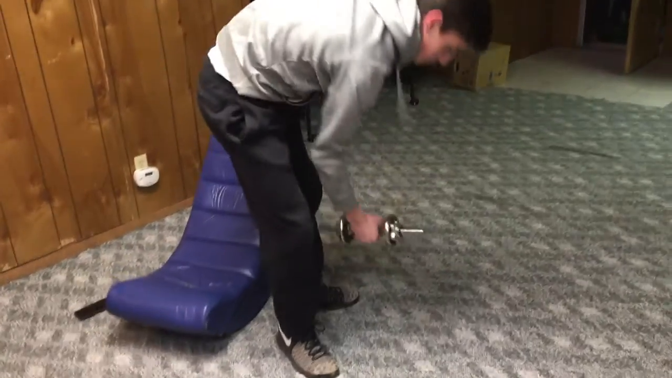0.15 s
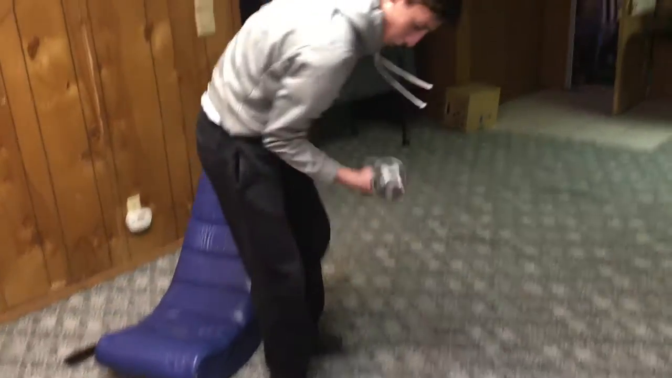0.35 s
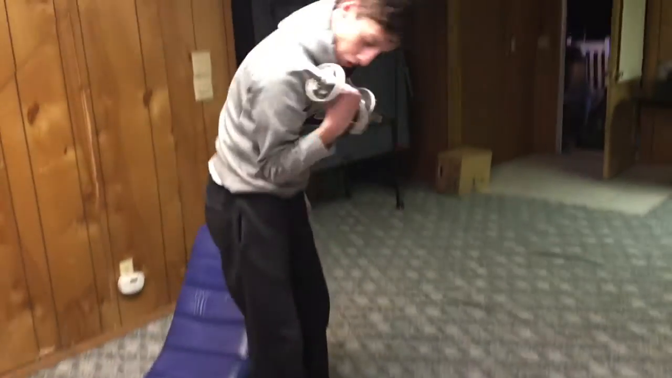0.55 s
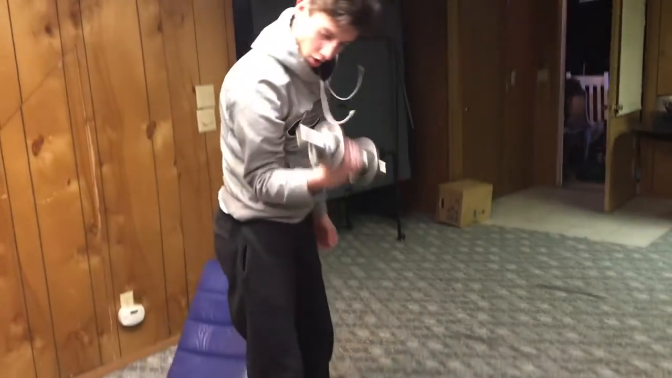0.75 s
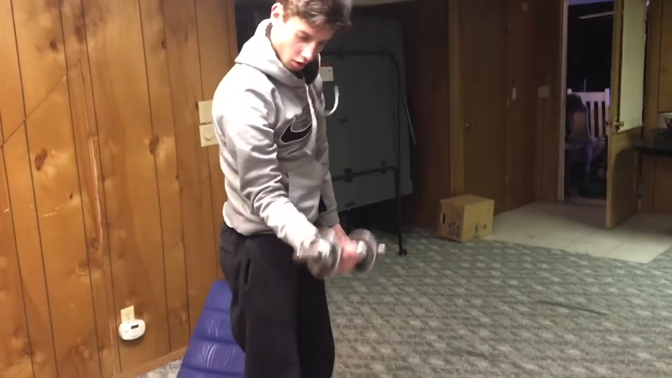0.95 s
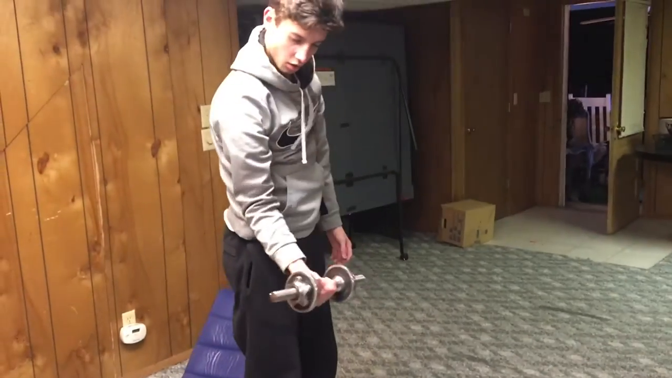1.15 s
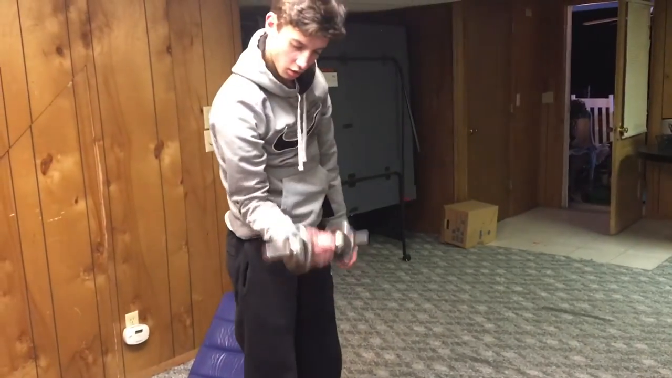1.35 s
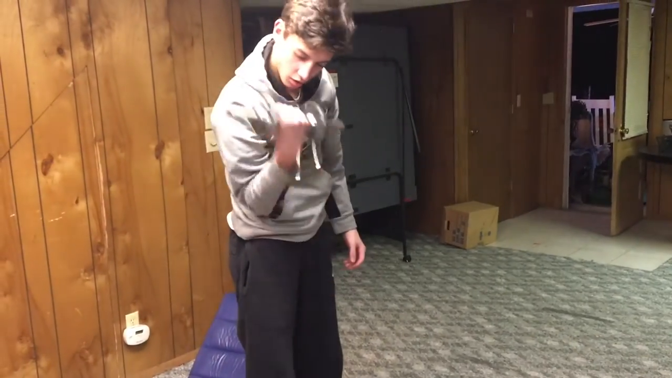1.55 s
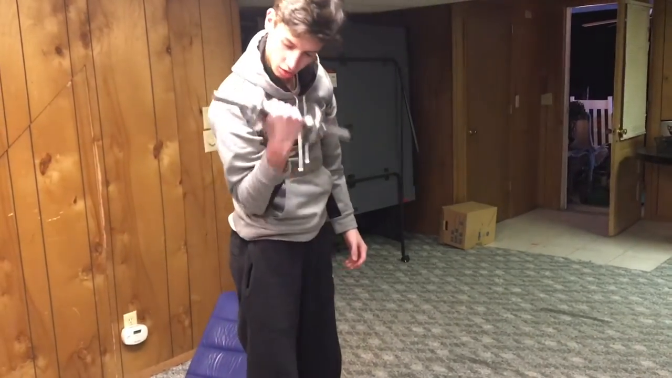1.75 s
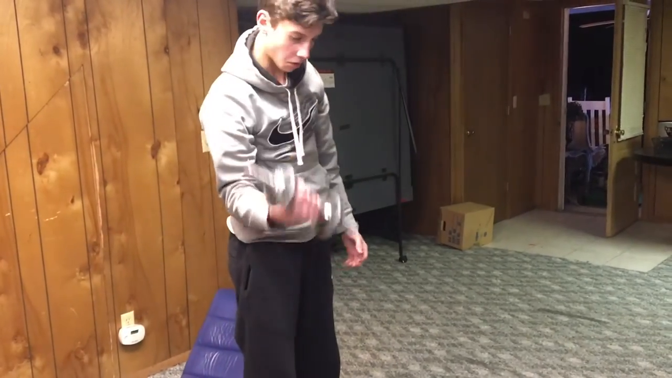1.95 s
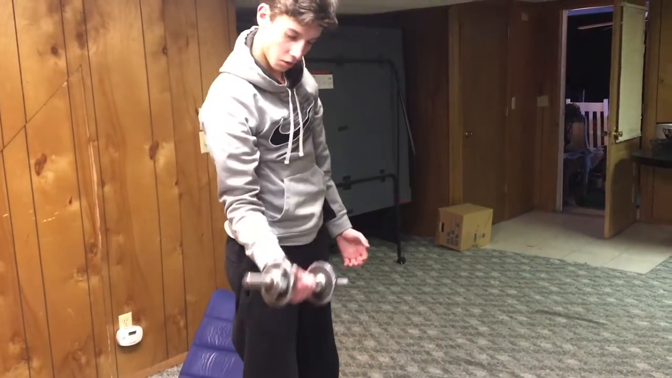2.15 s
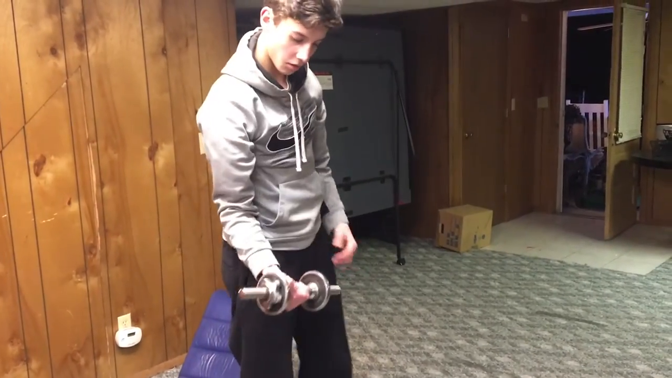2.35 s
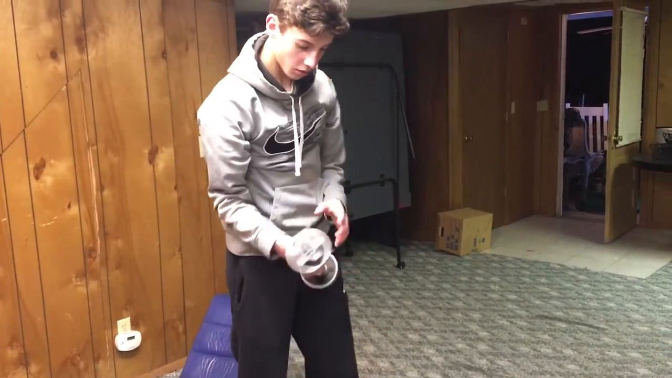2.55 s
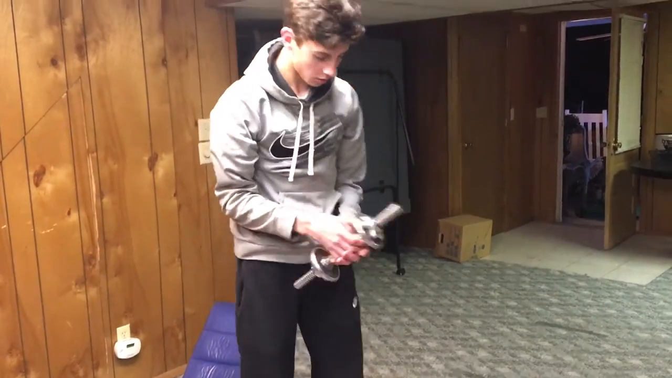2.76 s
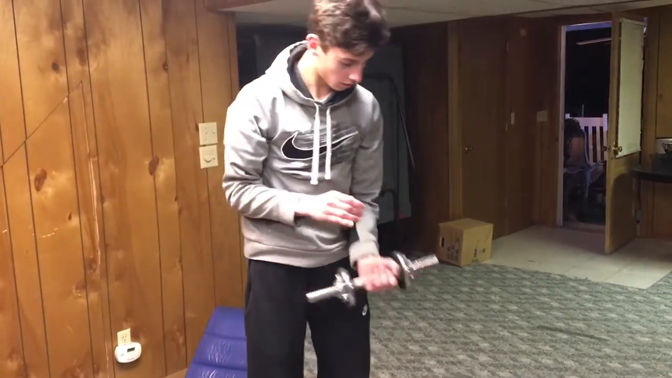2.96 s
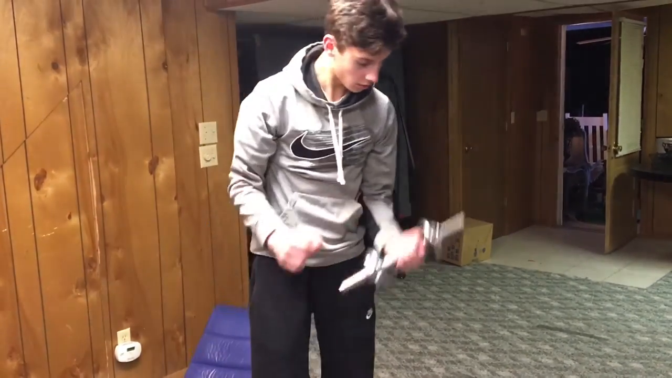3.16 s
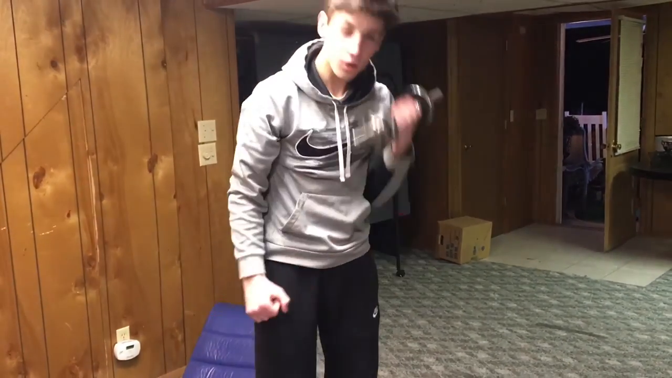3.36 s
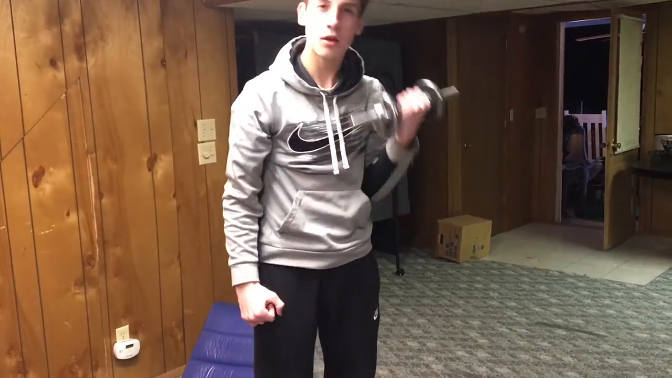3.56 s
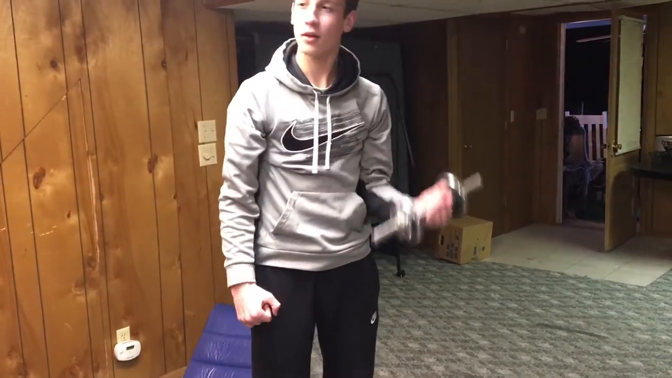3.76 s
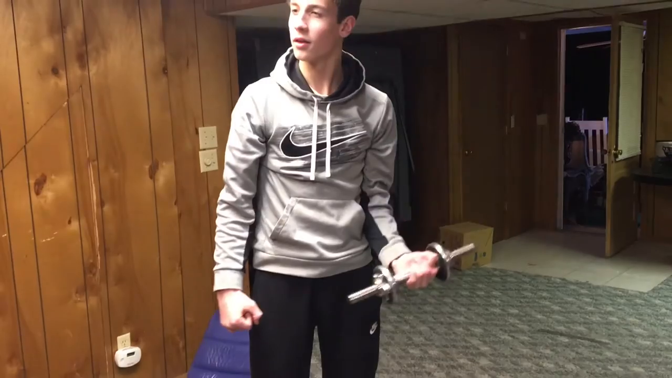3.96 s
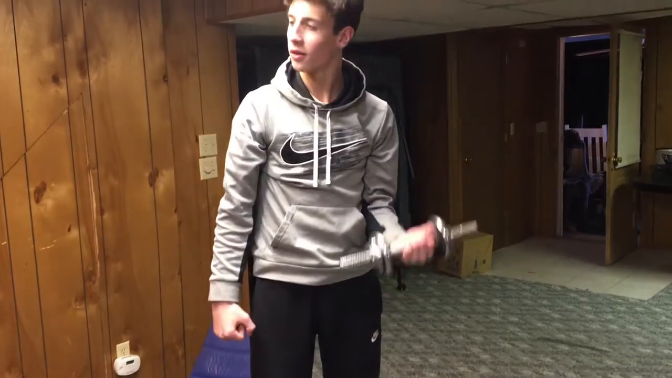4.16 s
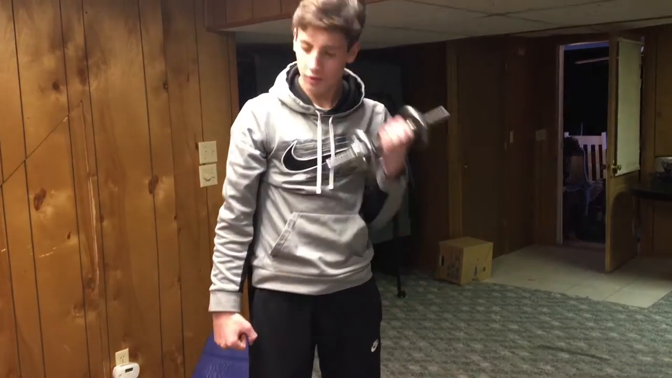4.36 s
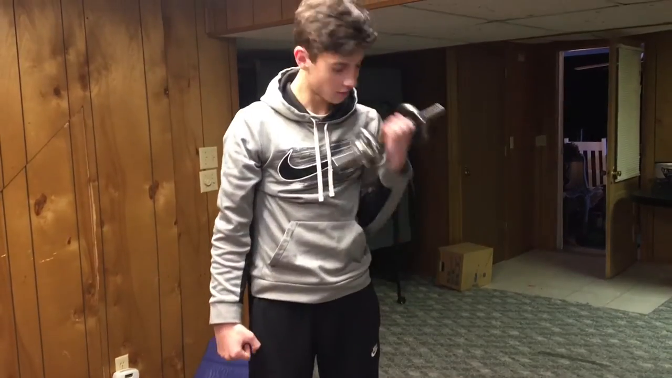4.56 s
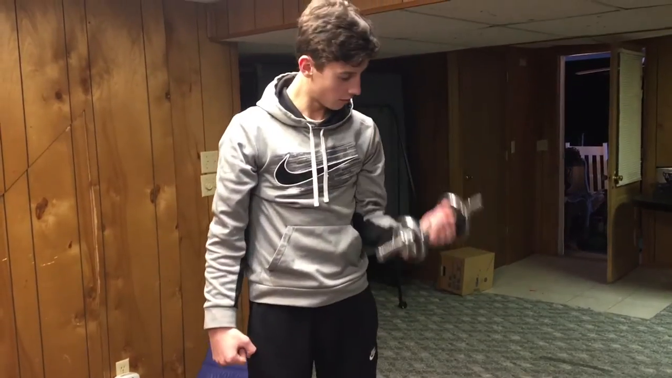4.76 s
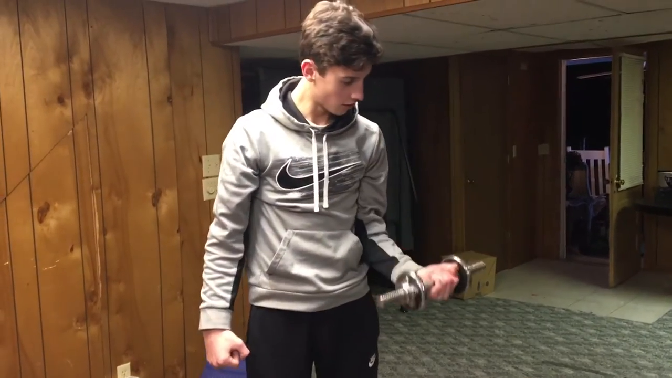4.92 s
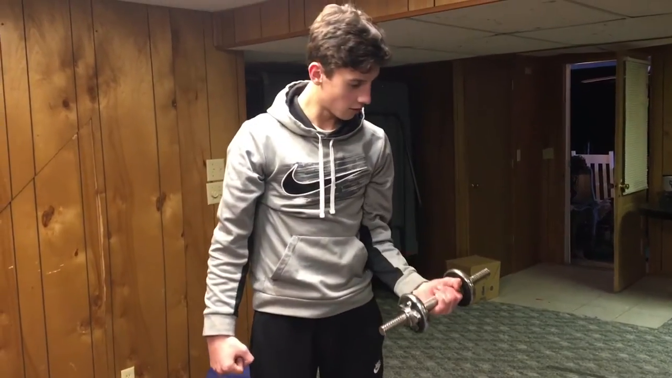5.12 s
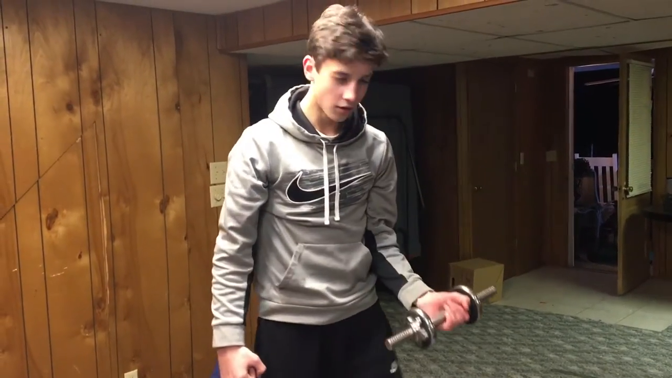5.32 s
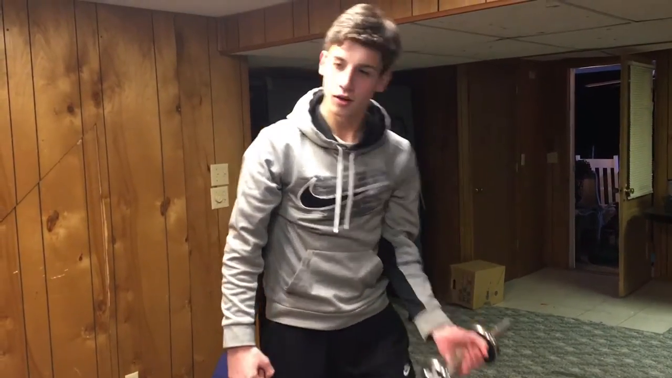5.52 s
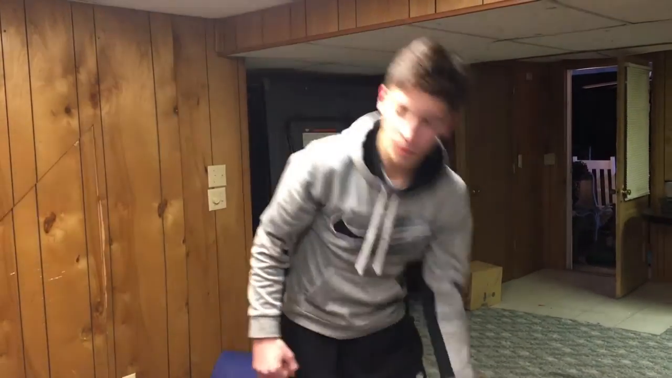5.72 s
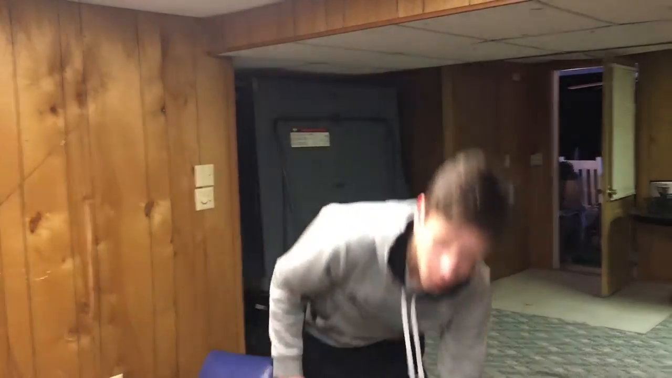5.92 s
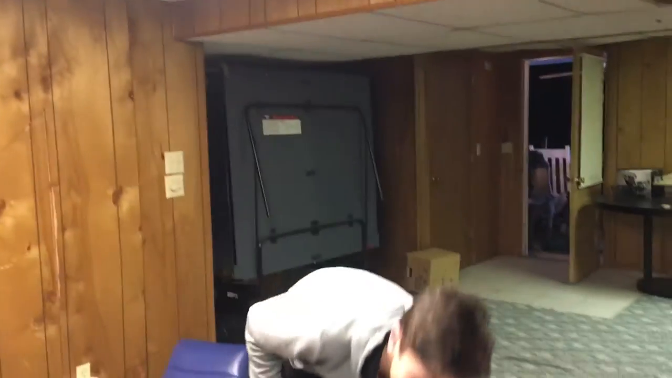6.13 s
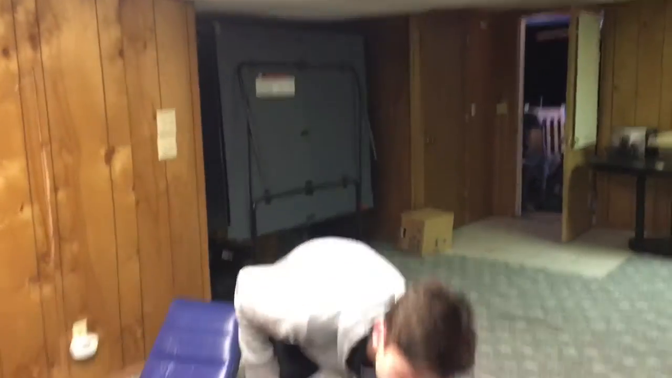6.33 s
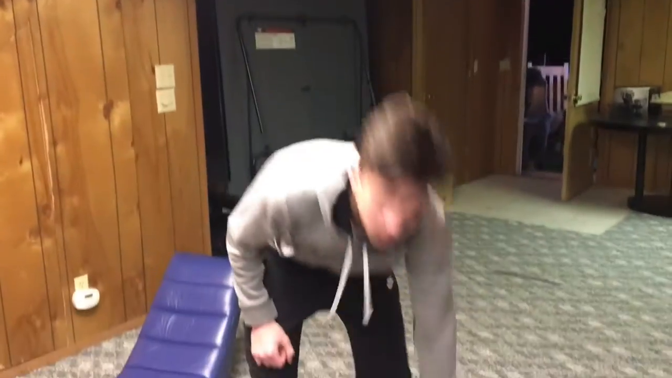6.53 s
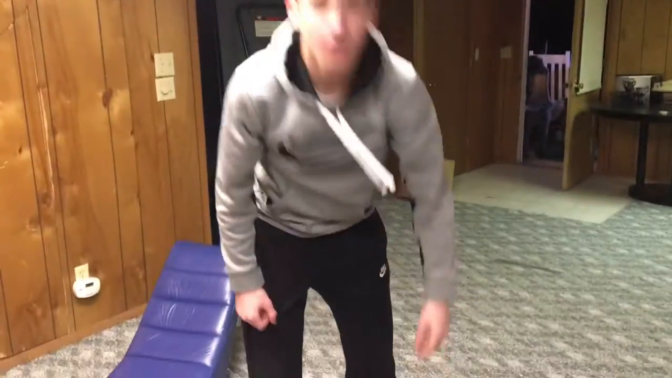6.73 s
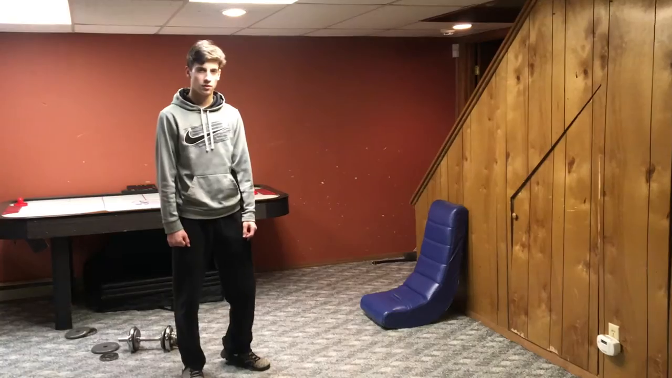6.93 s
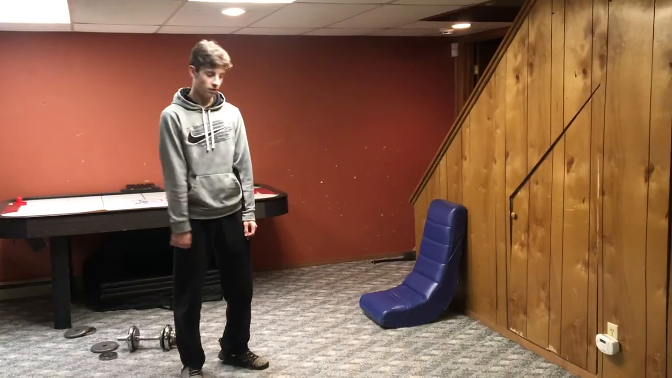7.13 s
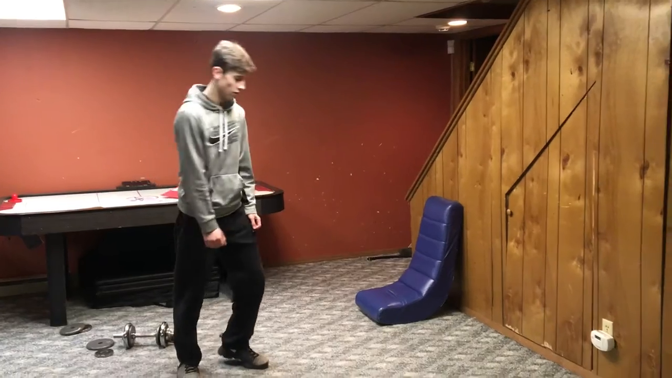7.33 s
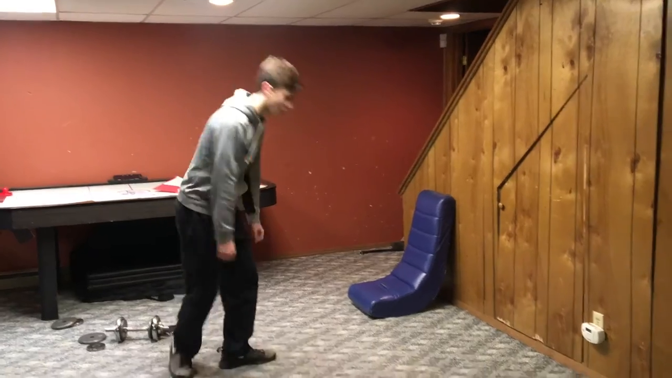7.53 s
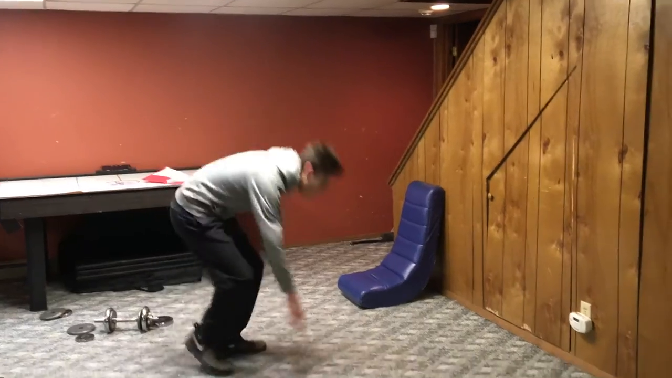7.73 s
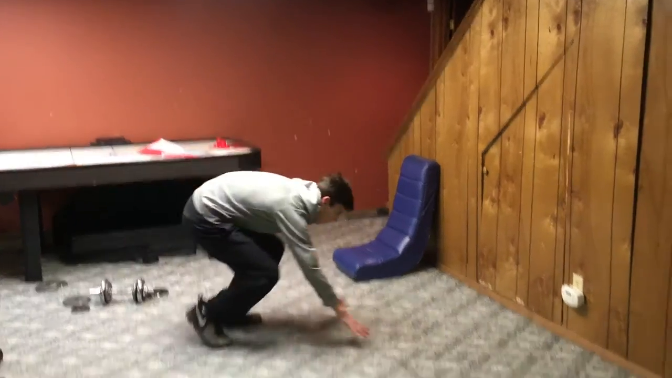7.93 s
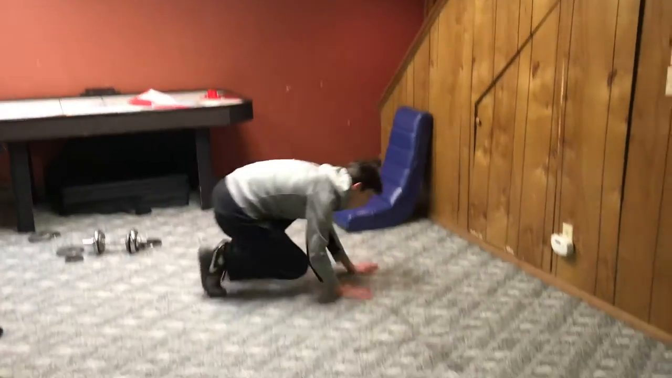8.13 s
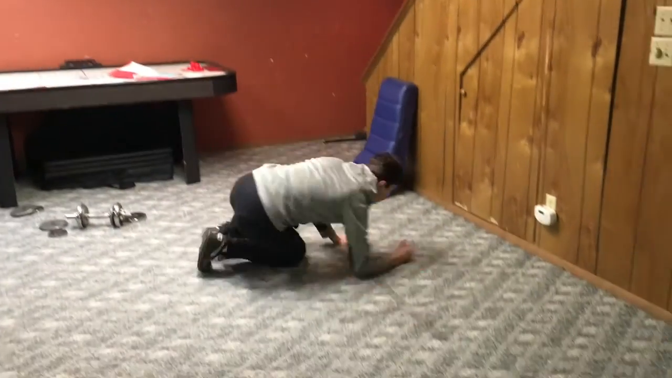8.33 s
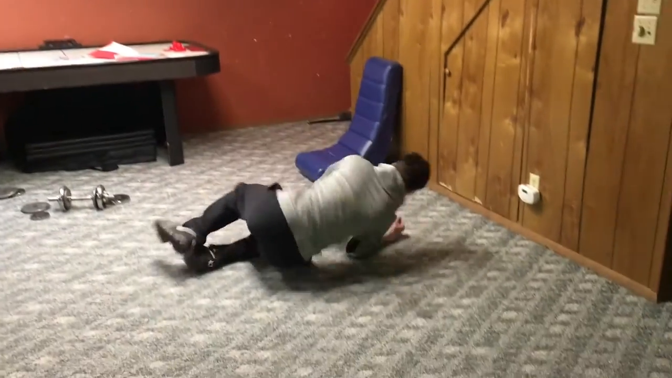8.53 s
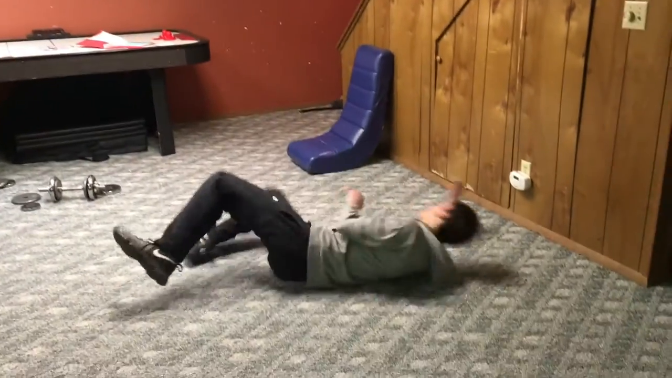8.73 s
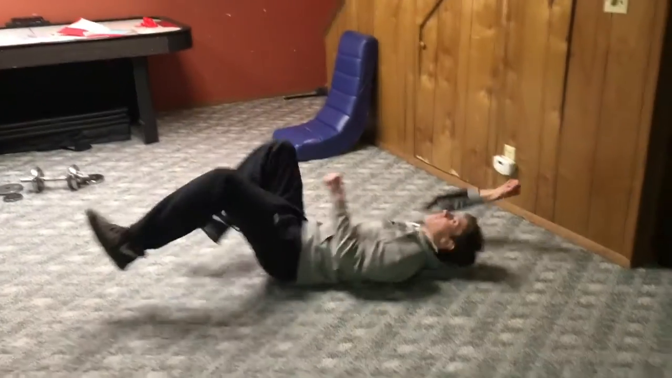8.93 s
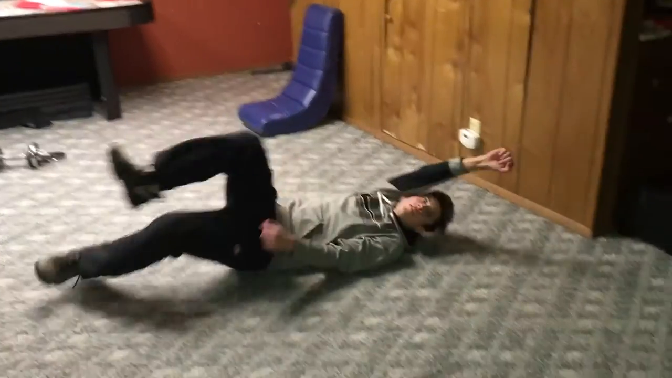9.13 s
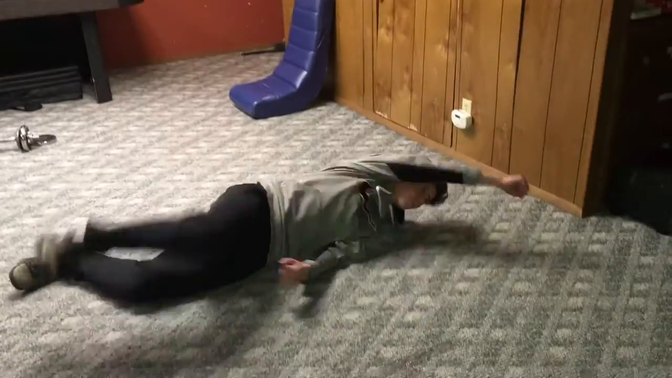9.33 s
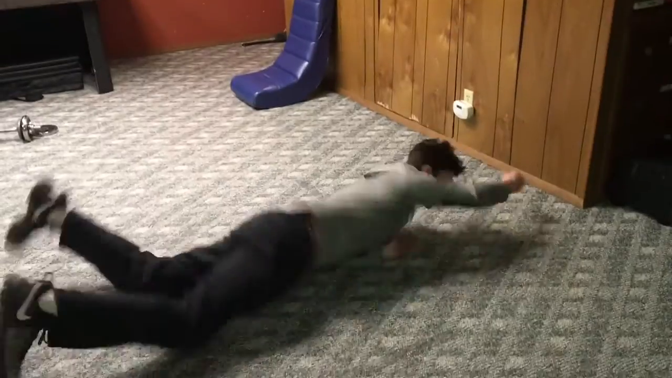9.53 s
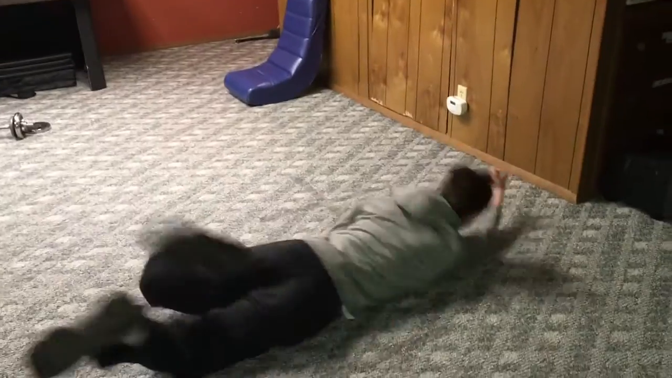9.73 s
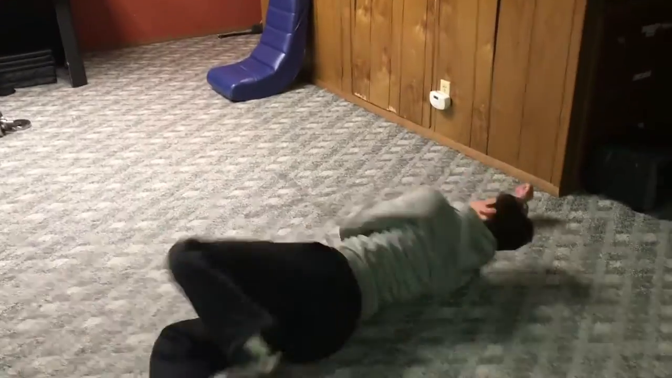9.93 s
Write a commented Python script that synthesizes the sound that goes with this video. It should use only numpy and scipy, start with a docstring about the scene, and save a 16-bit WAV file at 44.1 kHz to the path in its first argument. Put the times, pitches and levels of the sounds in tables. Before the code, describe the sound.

Loose iron plates clack and ring on a small dumbbell, which crashes down among spare plates, then a body thuds and rolls on carpet.

```python
"""A small dumbbell with loose iron plates is curled in a carpeted, wood-panelled basement with a low room rumble.
Plates slide and clack on the bar: filtered clicks with chatter, and decaying sines for plates, collars and bar.
It is then set down among spare plates with a clash of many modes, crowded treble noise and a boom of the woodwork.
Soft steps, a body dropping and rolling on the carpet (low thuds, grainy filtered noise) and a last knock on
the panelling follow."""
import sys
import numpy as np
from scipy import signal
from scipy.fft import rfft, irfft, next_fast_len
from scipy.io import wavfile
from scipy.ndimage import uniform_filter1d

SR = 44100
rng = np.random.default_rng(int(sys.argv[2]) if len(sys.argv) > 2 else 0)


def dump_mix(stems):
    """Bounce the given channels to the path in sys.argv[1] as a 16-bit WAV at rate SR."""
    frames = np.atleast_2d(stems).T  # one column per channel
    limited = np.clip(frames, -1, 1)  # hard clip at full scale
    pcm = np.round(limited * 32767).astype(np.int16)
    wavfile.write(sys.argv[1], SR, pcm)


N = 440118
T = np.arange(int(.7 * SR)) / SR  # time within one blow, s
ATTACK = int(.012 * SR)  # samples over which the level of a blow is set

# Dumbbell modes, one list each for plate low ring, plate high ring, collar and bar, before the scatter of
# each strike: pitch_hz, relative level_db, t60 relative to the ring time
IRON_MODES = [
    [(829, -20.5, 0.99), (1950, -42, 0.96), (1924, 2, 1), (2020, -16, 0.31), (2060, -4.5, 0.54)],
    [(3580, -28, 0.73), (3616, 6.5, 1.06), (3540, 5.5, 0.72), (4350, -13, 0.59), (4850, -17, 1.2),
     (8380, -14, 0.69), (11450, -15, 0.4)],
    [(3168, -1, 0.62), (3222, 1.5, 0.6), (4800, 11.5, 0.1), (4790, -9.5, 0.52), (6970, -19.5, 2.7)],
    [(5900, 23, 0.47), (6080, -13, 0.93)],
]


def undb(db):
    """Decibels to gain."""
    return 10 ** (np.asarray(db) / 20)


def fade(t60):
    """Exponential decay by 60 dB in t60 seconds, over the length of one blow."""
    return np.exp(-np.log(1000) * T / max(t60, 1e-3))


def blow(x, db):
    """Scale a blow so that its attack has the given rms level."""
    return x * undb(db) / np.sqrt(np.mean(x[:ATTACK] ** 2))


def add(track, s, x):
    """Mix x into the track at s seconds."""
    i = max(int(s * SR), 0)
    track[i:i + len(x)] += x[:max(N - i, 0)]


def colour(x, points, tilt_db=0):
    """Causal minimum-phase filter through (Hz, dB) points, tilted in dB per octave from 1 to 6.5 kHz."""
    size = next_fast_len(len(x)) * 2
    bin_hz = np.arange(size // 2 + 1) * SR / size
    octave = np.log2(np.maximum(bin_hz, 10))
    hz, db = np.transpose(points)
    tilted_db = db + tilt_db * np.log2(np.clip(hz, 1000, 6500) / 1000)
    gain_db = np.interp(octave, np.log2(hz), tilted_db)
    # folding the cepstrum forward in time gives the phase that keeps the filter causal
    cepstrum = irfft(gain_db * np.log(10) / 20)
    cepstrum[1:size // 2] *= 2
    cepstrum[size // 2 + 1:] = 0
    response = np.exp(rfft(cepstrum))
    return irfft(rfft(x, size) * response)[:len(x)]


def noise(points, grain_db=0):
    """Coloured noise of rms 1; grain makes it a crowd of unequal little snags."""
    snags = np.repeat(rng.standard_normal(N // 64 + 1), 64)[:N]
    x = colour(rng.standard_normal(N) * undb(grain_db * snags), points)
    return x / x.std()


def ring(modes, life=1, detune=.003, spot_db=2):
    """Decaying sines (Hz, dB, t60 times life); the spot that is struck shifts their pitch and balance."""
    chance = rng.standard_normal((len(modes), 2))
    out = np.zeros(len(T))
    for (hz, db, t60), (pitch_chance, level_chance) in zip(modes, chance):
        tone = np.sin(2 * np.pi * hz * (1 + detune * pitch_chance) * T)
        out += undb(db + spot_db * level_chance) * fade(t60 * life) * tone
    return out


def background(rumble_db=-60, tone_db=-66, tone_hz=60):
    """Low building rumble with a faint steady low tone and a faint hiss: filtered noise and a sine."""
    # colour of rumble and hiss: pitch_hz, relative density_db (dB per Hz)
    rumble_colour = [(15, -41), (28, -27.5), (42, -10), (62, -3), (85, -5.5), (110, -12.5), (145, -23),
                     (220, -28.5), (340, -30.5), (450, -36.5), (1000, -40), (3000, -45.5), (10000, -52.5),
                     (16000, -53)]
    low_tone = np.sqrt(2) * np.sin(2 * np.pi * tone_hz * np.arange(N) / SR)  # rms 1
    return undb(rumble_db) * noise(rumble_colour) + undb(tone_db) * low_tone


def room(x, first_s=0.012, sparse_db=4, low_t60_s=0.3, high_t60_s=0.14, room_db=-14.5):
    """Panelled walls return a short tail of uneven reflections whose treble dies first."""
    unevenness = undb(sparse_db * rng.standard_normal(len(T)))
    echoes = rng.standard_normal(len(T)) * unevenness * (T > first_s)
    low = signal.sosfilt(signal.butter(1, 2500, fs=SR, output="sos"), echoes)
    tail = low * fade(low_t60_s) + (echoes - low) * fade(high_t60_s)
    tail /= np.sqrt(np.sum(tail ** 2))
    return x + undb(room_db) * signal.fftconvolve(x, tail)[:N]


def snatching(depth_db=2, per_s=55):
    """Cloth catches and lets go: a gain that steps to random levels with short ramps between."""
    hold = int(SR / per_s)
    steps = np.repeat(rng.standard_normal(N // hold + 1), hold)[:N]
    return undb(depth_db * uniform_filter1d(steps, hold // 2))


def rubbing(swish_db=-0.5, scuff_db=0, brush_swish_db=-3.5, brush_scuff_db=-1.0, floor_db=-66, floor_follows=.4):
    """Grainy friction of sleeves and carpet; the harder the body drags on the pile, the more the floor shakes."""
    # colours of cloth on cloth, cloth on carpet and the loaded floor: pitch_hz, relative level_db
    swish_colour = [(800, -22), (2500, 2.5), (4000, 1), (6500, -2.5), (10000, -9), (13000, -11.5),
                    (16000, -14)]
    scuff_colour = [(200, -10), (500, 0), (900, 0.5), (1800, -1), (2800, -7.5), (4500, -17), (10000, -32.5)]
    floor_colour = [(50, -8), (110, 4), (230, -3), (350, -3), (480, -22), (900, -33), (3000, -61.5)]
    # body walking, dropping and rolling, before the swish and scuff offsets: time_s, treble_db, midrange_db
    friction_levels = [(7.2, -103, -84), (7.39, -75.5, -68.5), (7.45, -88, -77.5), (7.88, -75.5, -72.5),
                       (8.02, -90, -78), (8.06, -71, -63.5), (8.22, -77, -73), (8.25, -64, -65),
                       (8.32, -68, -70), (8.38, -65.5, -54.5), (8.5, -84, -78.5), (8.65, -74, -65.5),
                       (8.85, -72, -64), (8.96, -94, -88), (9.14, -104, -80.5), (9.29, -72, -57.5),
                       (9.31, -85, -67), (9.51, -70, -60.5), (9.9, -91.5, -80.5), (9.98, -82, -72.5)]
    # single brushes of sleeve or shoe, before the brush offsets: centre_s, spread_s, level_db
    brush_events = [(0.417, 0.058, -70.5), (2.459, 0.0095, -70.5), (2.674, 0.018, -65),
                    (2.902, 0.078, -70.5), (3.248, 0.04, -71.5), (3.34, 0.01, -64), (5.461, 0.014, -68.5),
                    (5.647, 0.018, -61.5), (5.844, 0.032, -72), (6.094, 0.017, -68), (6.171, 0.018, -72),
                    (6.924, 0.019, -72), (7.861, 0.0044, -61.5), (9.689, 0.011, -72.5),
                    (9.806, 0.017, -70.5)]
    t = np.arange(N) / SR
    times, treble_db, midrange_db = np.transpose(friction_levels)
    swish = undb(np.interp(t, times, treble_db, left=-160))
    drag = undb(np.interp(t, times, midrange_db, left=-160))
    brushes = np.zeros(N)
    for s, spread, db in brush_events:
        brushes += undb(db) * np.exp(-.5 * ((t - s) / spread) ** 2)
    cloth = noise(swish_colour, grain_db=2.5) * (swish * undb(swish_db) + brushes * undb(brush_swish_db))
    carpet = noise(scuff_colour, grain_db=2.0) * (drag * undb(scuff_db) + brushes * undb(brush_scuff_db))
    shaking = undb(floor_db) * (drag / undb(midrange_db.mean())) ** floor_follows
    return (cloth + carpet) * snatching() + noise(floor_colour) * shaking


def slap(db, t60):
    """A short burst of cloth or skin meeting a surface: filtered, fading noise."""
    # colour of a slap on carpet or cloth: pitch_hz, relative level_db
    slap_colour = [(150, -23), (400, 4), (800, 5), (1600, -7), (3000, -10), (6000, -20), (10000, -23.5),
                   (16000, -29)]
    return blow(colour(rng.standard_normal(len(T)) * fade(t60), slap_colour), db)


def thuds(push_t60=0.024, shake=1.0, shake_t60=.28, middle_slap_db=-10.5, middle_hz=240, slap_db_per_octave=11.5):
    """A soft push of a cycle or two, the floor shaking after it, and a slap, stronger for a quicker push."""
    # feet, hands, body and dumbbell on the floor: start_s, level_db without the slap, push pitch_hz
    thud_events = [(0.481, -60.5, 310), (2.65, -57.5, 342), (5.659, -60, 320), (6.067, -58, 216),
                   (6.2751, -49, 340), (6.915, -52, 111.4), (7.256, -52.5, 150.3), (7.327, -56, 298),
                   (7.488, -49.5, 72), (7.848, -57, 277), (7.922, -54, 280), (8.058, -53.5, 202),
                   (8.135, -54, 160), (8.375, -49, 227), (8.682, -51, 210), (8.715, -48.5, 151.4),
                   (9.15, -54, 182), (9.222, -48.5, 239), (9.242, -47, 111), (9.648, -55, 260)]
    out = np.zeros(N)
    for s, db, hz in thud_events:
        slap_db = db + middle_slap_db + slap_db_per_octave * np.log2(hz / middle_hz)
        rise = 1 - np.exp(-T * hz)
        push_fade = fade(push_t60 * 200 / hz)  # push_t60 holds at 200 Hz
        push = blow(np.sin(2 * np.pi * hz * T) * push_fade * rise, 0)
        octaves = hz * 2. ** np.arange(-2, 4)
        floor_points = list(zip(octaves, (-9, -2.5, 2.5, -10.5, -25.5, -52)))
        floor = colour(rng.standard_normal(len(T)), floor_points)
        body = push + shake * floor / floor.std() * fade(shake_t60) * rise
        add(out, s, blow(body, db) + slap(slap_db, t60=0.062))
    return out


def knocks(rise_s=0.002):
    """Heavy blows make the hollow woodwork boom in its modes; the panel takes a moment to move."""
    # blows on the woodwork: start_s, boom level_db, slap_db
    knock_events = [(6.2892, -45.5, -62.5), (9.5715, -36.5, -52.5)]
    # woodwork modes before the scatter of each strike: pitch_hz, relative level_db, t60_s
    wood_modes = [(131.4, -16, 0.66), (176, -2, .12), (233.9, 5, 0.071), (280, -7, .25), (354, -2, 0.19),
                  (409, -2, 0.14), (421, -14.5, .09), (621, -18, 0.15)]
    out = np.zeros(N)
    for s, db, slap_db in knock_events:
        boom = ring(wood_modes, detune=0.011) * (1 - np.exp(-T / rise_s))
        add(out, s, blow(boom, db) + slap(slap_db, t60=.09))
    return out


def clack(db, hardness, bounce=0.032, bounce_t60=.009, chatter=0.091, chatter_t60=.09, uneven_db=6):
    """Iron meets iron: a sharp contact, a few quick rebounds and an uneven dying chatter."""
    # colour of a plate clacking on the bar, before the hardness tilt: pitch_hz, relative level_db
    clack_colour = [(100, -26.5), (430, -15.5), (700, -5.5), (1150, -2), (1550, 1), (2100, 2.5), (2650, -9),
                    (3400, -2.5), (4200, -10.5), (4900, -15.5), (6500, -18), (8000, -32.5), (10500, -34.5),
                    (16000, -49.5)]
    taps = rng.standard_normal(len(T)) * undb(uneven_db * rng.standard_normal(len(T)))
    rebounds = bounce * fade(bounce_t60) + chatter * fade(chatter_t60)
    impulses = (T == 0) + rebounds * taps / taps.std()
    return blow(colour(impulses, clack_colour, hardness), db)


def iron(modes, db, t60, hardness=0, tilt_db=0.78, rough=0.25, buzz_hz=260, rise_s=0.0025):
    """A ringing piece buzzes against its neighbours; soft contacts leave its high modes quiet."""
    buzz = signal.sosfilt(signal.butter(2, buzz_hz, fs=SR, output="sos"), rng.standard_normal(len(T)))
    softness_tilt = tilt_db * min(hardness - 1, 0)  # dB per octave above the first mode listed
    first_hz = modes[0][0]
    struck = [(hz, g + softness_tilt * np.log2(hz / first_hz), life) for hz, g, life in modes]
    buzzing = ring(struck, t60, detune=0.0057) * (1 + rough * buzz / buzz.std())
    return blow(buzzing * (1 - np.exp(-T / rise_s)), db)


def set_down(free_db=-21, free_t60=.2, top_free_db=-11, top_free_t60=0.16,
             shimmer_db=-21, shimmer_t60=.06, heap_chatter=0.074):
    """The dumbbell crashes into the spare plates and bounces; those not under it ring on faintly."""
    # landing and bounces: start_s, clack_db, hardness (dB per octave), heap ring_db, top plate ring_db, t60_s
    clash_events = [(6.2865, -34.5, 5.5, -27.5, -48, 0.024), (6.2889, -40, 9, -34.5, -39, 0.028),
                    (6.3856, -55, -4, -50, -50, 0.019), (6.4028, -43.5, 8, -56, -46, 0.074),
                    (6.4191, -36, 9, -60, -40, .08), (6.4555, -39.5, 7.5, -35, -38.5, 0.022)]
    # heap of spare plates and its top plate, before scatter: pitch_hz, relative level_db, relative t60
    heap_modes = [(948, -18, 2.3), (1612, -16.5, .8), (1798, -11, .9), (2378, -10.5, .9), (2840, -11, .8),
                  (3680, -5.5, .8), (3730, 6.5, 1.1), (4100, -5.5, 0.64), (4630, -7.5, 1.5),
                  (4780, -3, 0.82), (4900, -2, 1.078), (5270, -7, 1.1), (5910, -2.5, 1.8), (6223, -9, 0.56),
                  (8340, -11.5, 1.4), (8180, -16, 1.3), (9539, -26, 0.43), (11490, -11.5, 1.),
                  (12450, -24, .9), (14630, -32, .9)]
    top_plate_modes = [(3206, -2, 2.5), (3090, -2.5, 1.)]
    # colour of the crowd of faint high modes in the spare plates: pitch_hz, relative level_db
    shimmer_colour = [(3000, -24.5), (5000, -3.5), (7000, -5.5), (8400, -1), (10000, -9), (11500, -0.5),
                      (13000, -4), (16000, -11.5)]
    out = np.zeros(N)
    for s, db, hardness, heap_db, top_db, t60 in clash_events:
        heap = iron(heap_modes, heap_db, t60, rough=.55, buzz_hz=320)
        heap += blow(ring(heap_modes, free_t60), heap_db + free_db)
        top = iron(top_plate_modes, top_db, t60)
        top += blow(ring(top_plate_modes, top_free_t60), top_db + top_free_db)
        crowd = colour(rng.standard_normal(len(T)) * fade(shimmer_t60), shimmer_colour)
        shimmer = blow(crowd, db + shimmer_db)
        add(out, s, clack(db, hardness, chatter=heap_chatter) + heap + top + shimmer)
    return out


def contact(kind, db, t60, middling_db=-47.5, hardness_per_db=0.49, middling_chatter=0.08, chatter_per_db=-.5):
    """A clack and the ring of each part in its share; a strong blow is brighter and seats, a weak one chatters."""
    # ways the iron parts meet, against the blow: clack_db, plate low ring_db, plate high ring_db,
    # collar_db, bar_db; then hardness of a middling blow (dB per octave)
    contact_shares = {"rim": (-10.5, -0.5, -16, -33, -30, 0.5), "face": (-3, 0, -2.5, -8, -18.5, 4.5),
                      "chime": (-20, -1.5, -0.5, -15, -20.5, 0.5), "edge": (-10, -8, 1.5, -22, -19.5, -1),
                      "collar": (-0.5, -19, -13, 0, -18, -3), "wedged": (-3.5, -6.5, -14, -3, -19, -5.5),
                      "stop": (-1.5, -24, -32, -5, -14.5, -4), "bar": (-2.5, -16.5, -21, -16.5, -11, 0)}
    clack_db, *part_dbs, hardness = contact_shares[kind]
    force_db = db - middling_db
    hardness = hardness + hardness_per_db * force_db
    rings = sum(iron(modes, db + part_db, t60, hardness) for modes, part_db in zip(IRON_MODES, part_dbs))
    chatter = middling_chatter * undb(chatter_per_db * force_db)
    return clack(db + clack_db, hardness, chatter=chatter) + rings


def dry_clack(db, hardness, pinched_db=-6, tock_per_hardness=0.42, dry_chatter=0.15,
              settle_db=-2, loose_hardness=-5):
    """A pinched plate gives a short tock; a harder tick stirs the plate less and chatters less."""
    # short modes of a pinched plate before the scatter of each strike: pitch_hz, relative level_db, t60_s
    pinched_modes = [(1120, 0.5, 0.071), (1287, 9.5, 0.033), (1590, 1.5, 0.14)]
    tock = blow(ring(pinched_modes, detune=0.031), db + pinched_db - tock_per_hardness * hardness)
    chatter = dry_chatter * undb(settle_db * max(hardness - loose_hardness, 0))
    return clack(db, hardness, chatter=chatter) + tock


def sliding(taps_per_s=95, fall_db=-6.5, scatter_db=0.5, hardness=-5.5,
            tock_db=-3, ring_t60=.05, spacing_scatter=0.25):
    """A sliding plate taps the bar at uneven intervals, on the whole ever more weakly, and rings a little."""
    # slides along the bar: start_s, length_s, level_db before fall and tap offset, rim ring_db against it
    slide_events = [(0.713, .135, -63, 6), (1.612, 0.12, -72, 4), (1.95, .12, -58, -34),
                    (2.85, 0.083, -66.5, -6), (3.206, .1, -68, -12), (3.402, .16, -62.5, 3),
                    (4.282, .05, -67.5, -5), (4.658, 0.092, -65, 2.5)]
    out = np.zeros(N)
    for start, length, db, ring_db in slide_events:
        count = max(int(length * taps_per_s), 1)
        for k, (late, size) in enumerate(rng.standard_normal((count, 2))):
            along = (k + .5 + spacing_scatter * late) / count  # 0 to 1 through the slide
            tap_db = db + fall_db * along + scatter_db * size
            rim = blow(ring(IRON_MODES[0], ring_t60, detune=0.084), tap_db + ring_db)
            add(out, start + along * length, dry_clack(tap_db + tock_db, hardness) + rim)
    return out


def dumbbell():
    """Plates slide along the bar as it tilts, clacking and setting the iron parts ringing."""
    # ringing contacts: start_s, blow level_db, ring time_s, kind of contact
    clink_events = [(0.009, -60.5, .2, "bar"), (0.5044, -43.5, 0.067, "stop"),
                    (0.6068, -50, 0.074, "wedged"), (0.619, -60, 0.64, "rim"), (0.7256, -51, 0.048, "face"),
                    (0.744, -44.5, 0.058, "rim"), (0.7595, -51.5, 0.13, "collar"),
                    (0.7807, -45.5, 0.021, "wedged"), (0.8041, -52, 0.085, "wedged"),
                    (1.6328, -56.5, 0.087, "rim"), (1.8434, -46, .08, "bar"), (1.872, -50.5, 0.16, "bar"),
                    (1.9238, -53, 0.062, "bar"), (1.9909, -55.5, 0.044, "bar"),
                    (2.7360, -57, 0.025, "face"), (2.877, -57.5, 0.026, "face"),
                    (2.9792, -42.5, 0.21, "edge"), (3.0243, -46, .11, "rim"), (3.3926, -55.5, 0.16, "face"),
                    (3.4171, -60.5, .2, "edge"), (3.4398, -58.5, 0.064, "face"),
                    (3.451, -43.5, 0.087, "collar"), (3.4779, -51, 0.12, "wedged"),
                    (3.4976, -55.5, 0.19, "face"), (3.58, -55.5, 0.19, "wedged"), (3.603, -57, 0.19, "rim"),
                    (3.698, -44, .079, "collar"), (4.4547, -57, 0.12, "rim"), (4.4713, -37, 0.058, "chime"),
                    (4.4787, -42.5, 0.012, "chime"), (4.7009, -52.5, 0.067, "edge")]
    # dry clacks of plates pinched too tight to ring: start_s, clack level_db, hardness (dB per octave)
    clack_events = [(0.125, -66.5, 7), (.256, -61, -7), (0.577, -54, -2.5), (0.88, -65, -17),
                    (0.915, -64, -6), (0.9593, -66, -13), (1.0424, -64.5, -6), (1.9602, -65, -2),
                    (2.028, -56.5, -2.5), (2.049, -67, -3), (2.8353, -61.5, -1.5), (3.7492, -50.5, -4),
                    (3.788, -52.5, -2.5), (5.54, -56.5, 3.5), (6.429, -46.5, -13), (6.574, -63.5, 6)]
    out = np.zeros(N)
    for s, db, t60, kind in clink_events:
        add(out, s, contact(kind, db, t60))
    for s, db, hardness in clack_events:
        add(out, s, dry_clack(db, hardness))
    return out + sliding()


def scene():
    """All sources in the room over the background, on one channel."""
    sources = dumbbell() + set_down() + thuds() + knocks() + rubbing()
    return (room(sources) + background())[None]


def record(dry, top_hz=15650):
    """The recorder cuts the top with a steep low-pass."""
    return signal.sosfilt(signal.ellip(10, .2, 70, top_hz, fs=SR, output="sos"), dry)


dry = scene()
out = record(dry)
dump_mix(out)
```